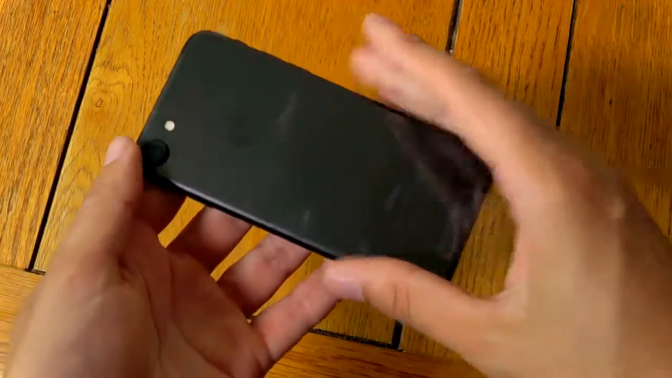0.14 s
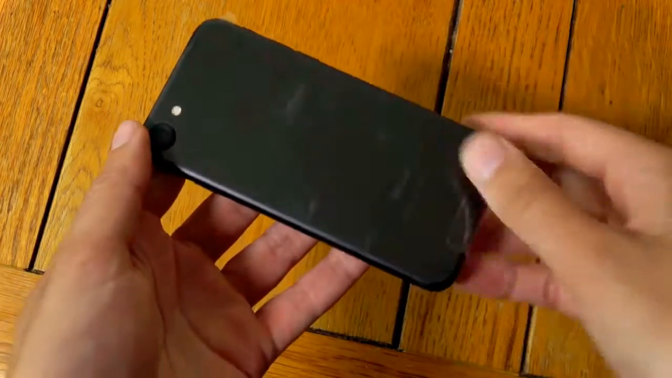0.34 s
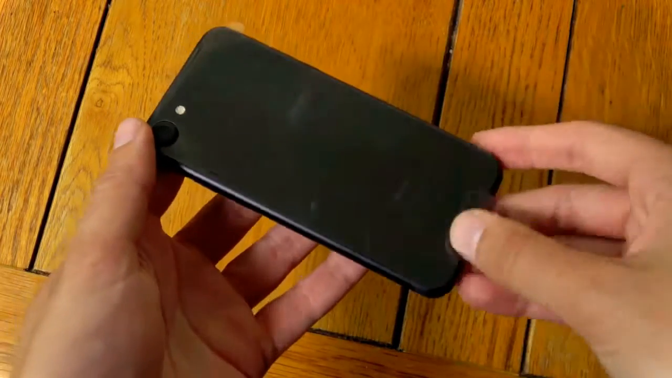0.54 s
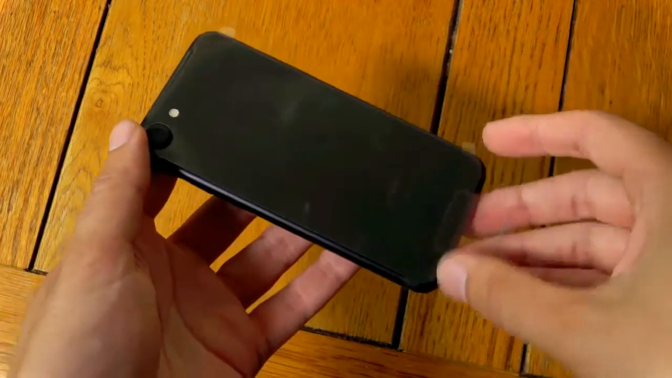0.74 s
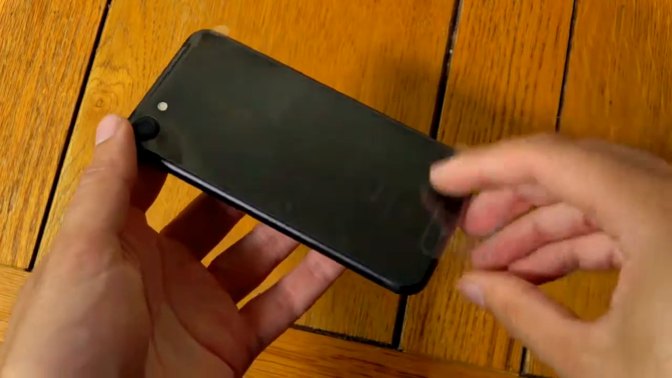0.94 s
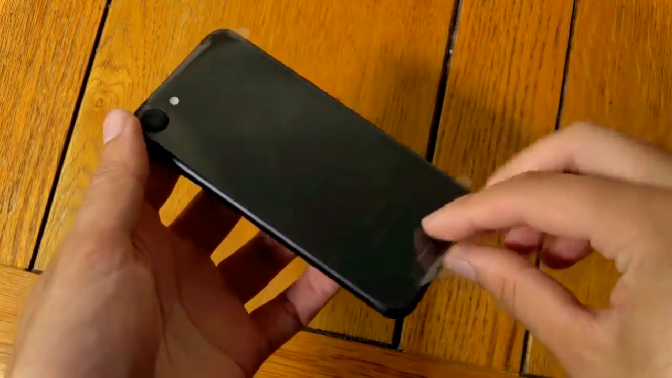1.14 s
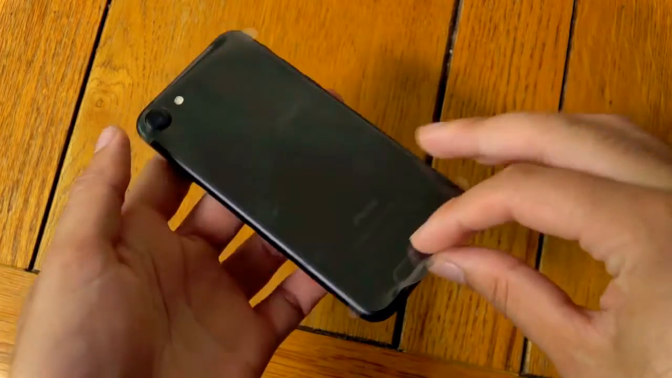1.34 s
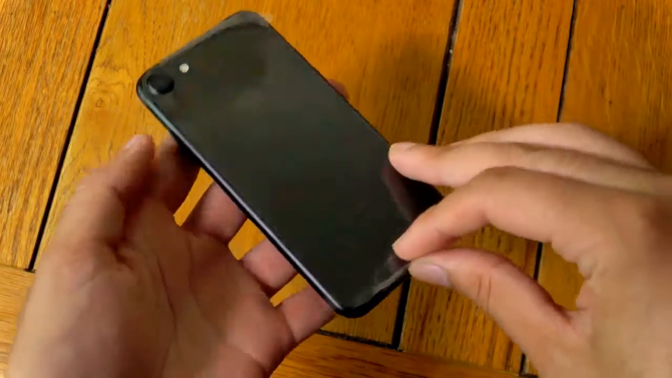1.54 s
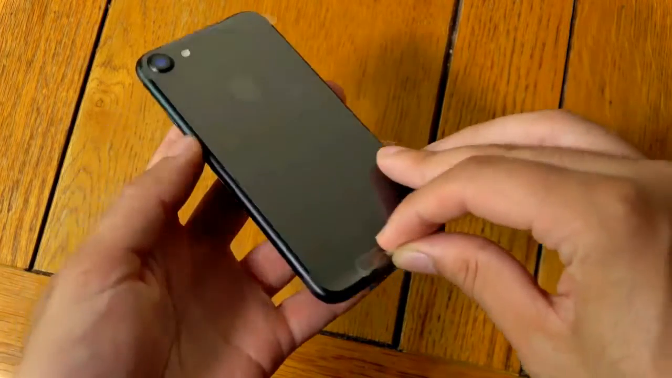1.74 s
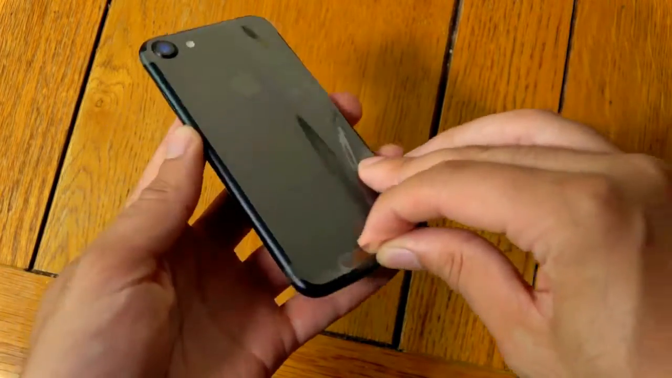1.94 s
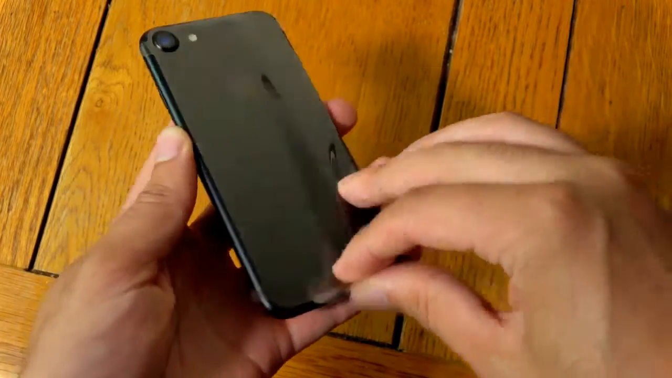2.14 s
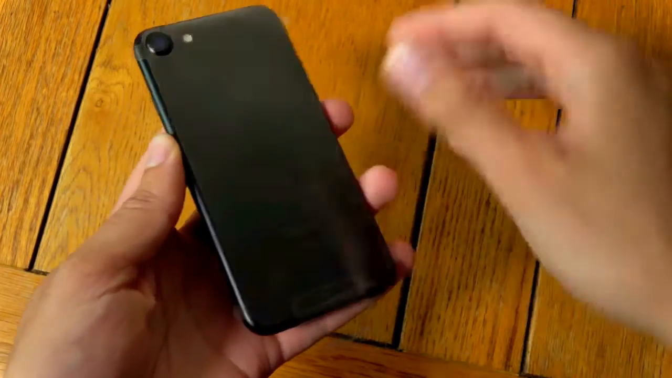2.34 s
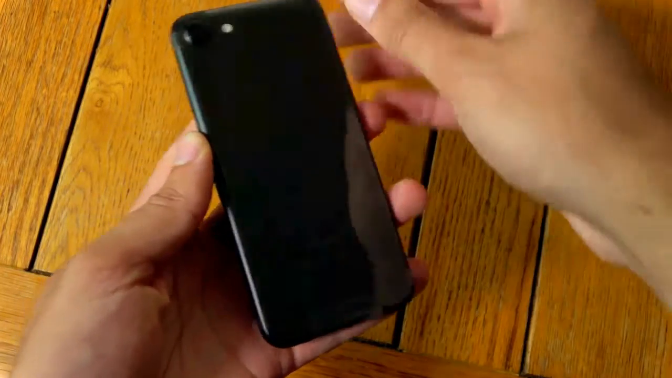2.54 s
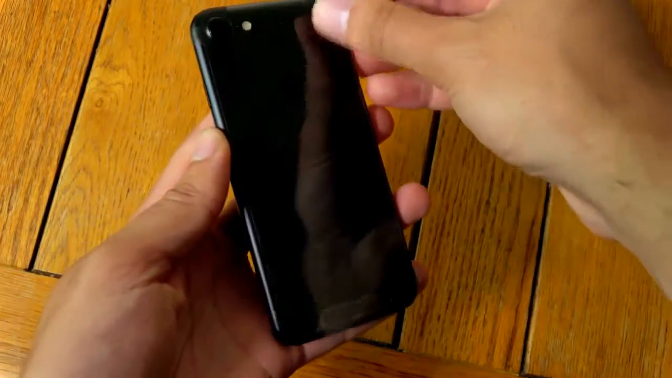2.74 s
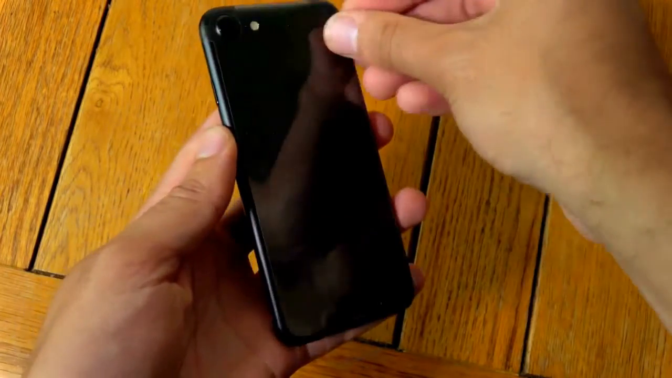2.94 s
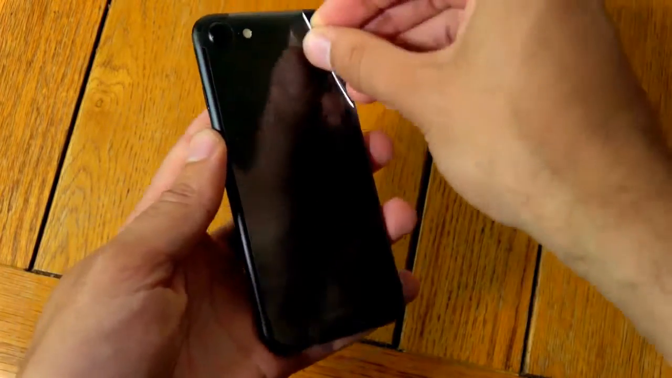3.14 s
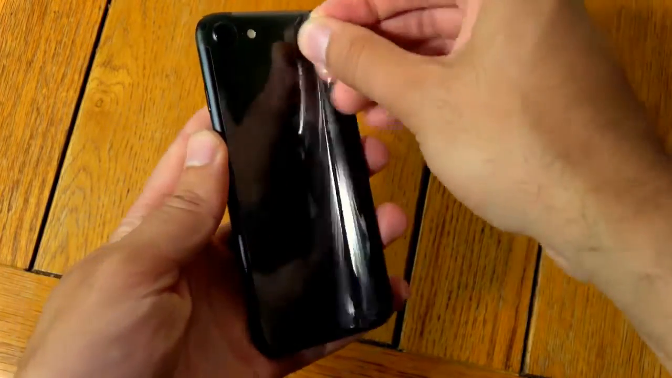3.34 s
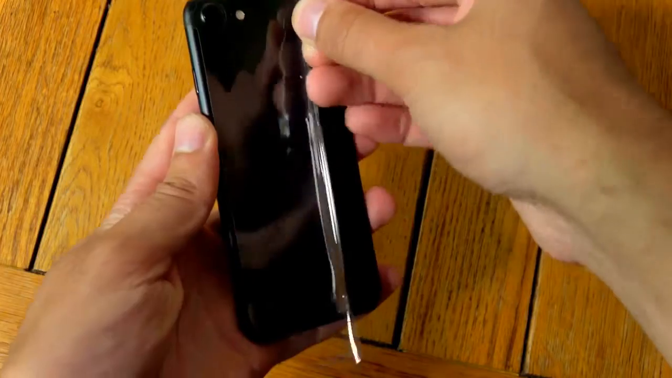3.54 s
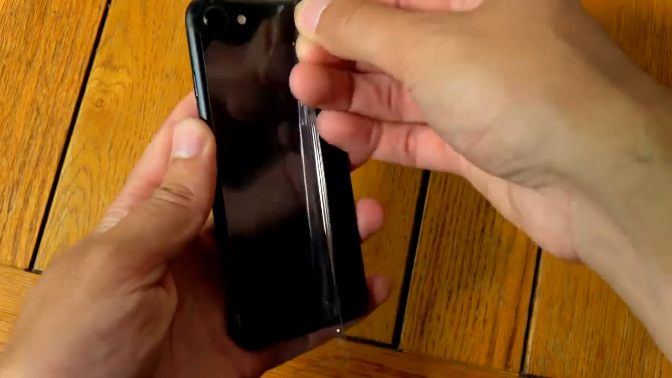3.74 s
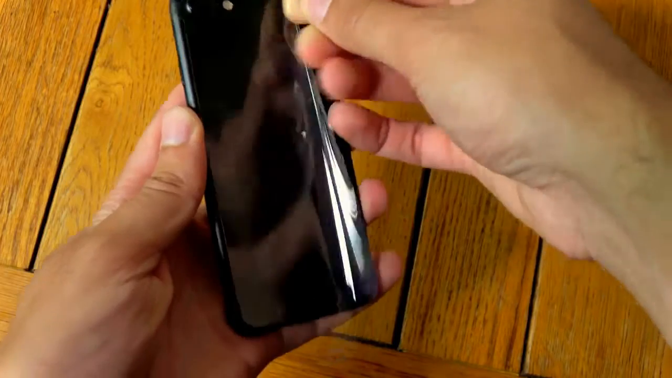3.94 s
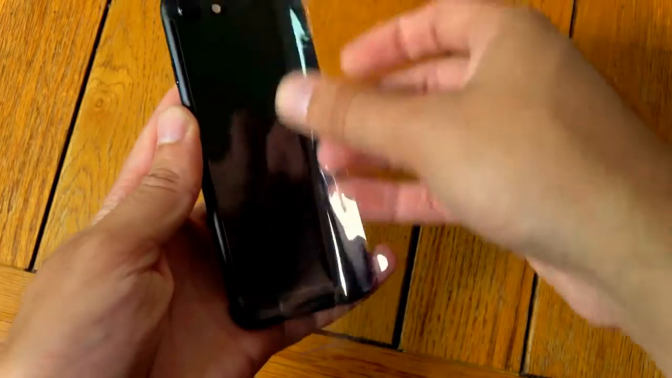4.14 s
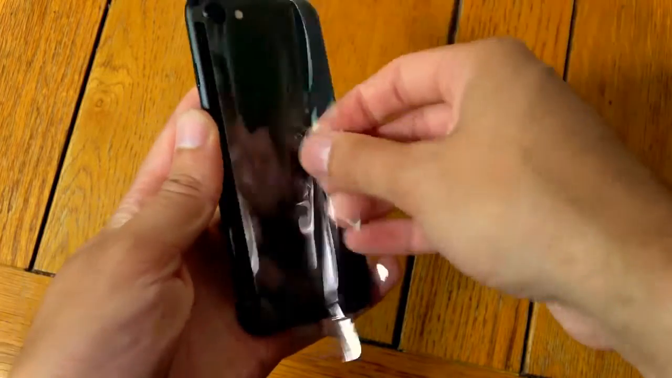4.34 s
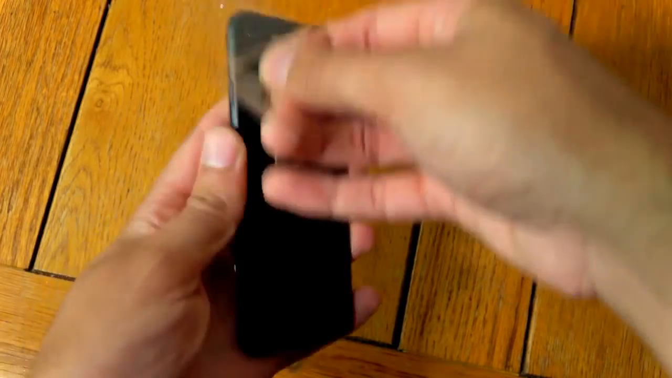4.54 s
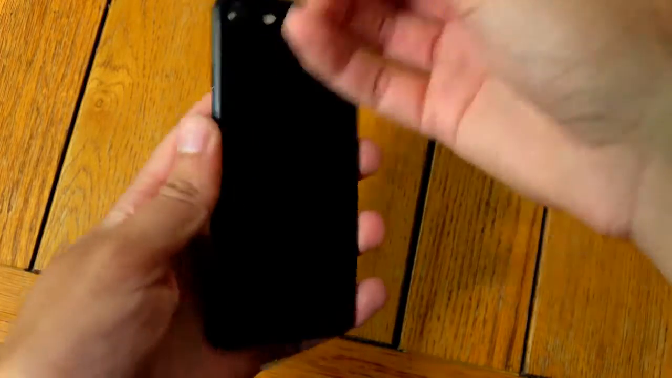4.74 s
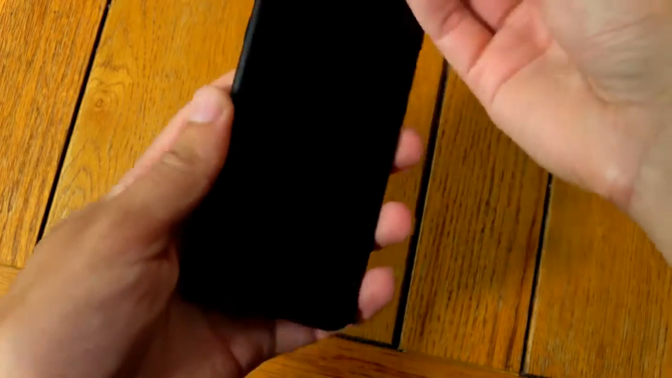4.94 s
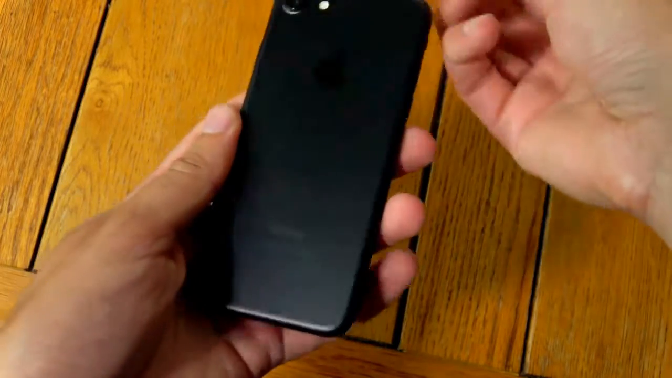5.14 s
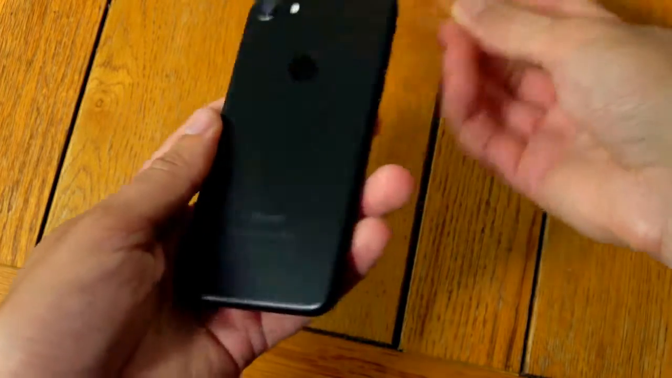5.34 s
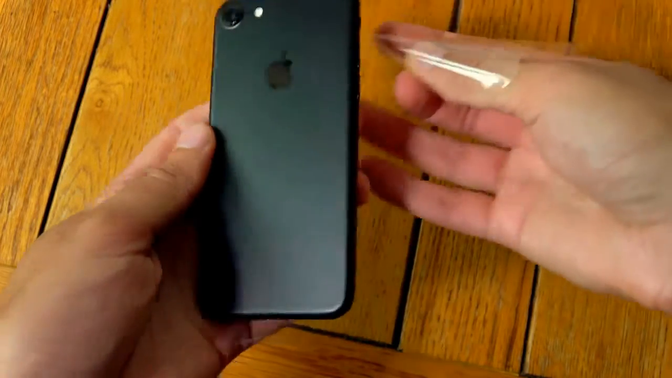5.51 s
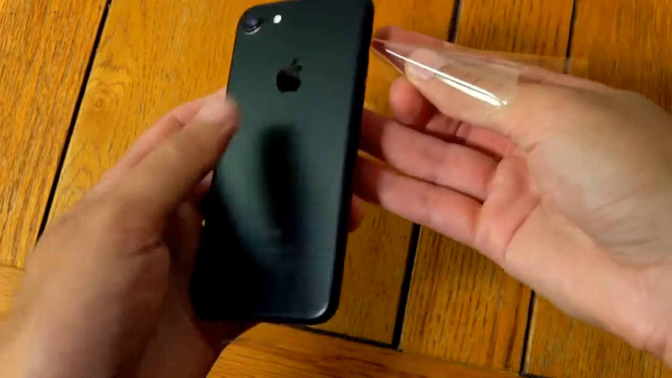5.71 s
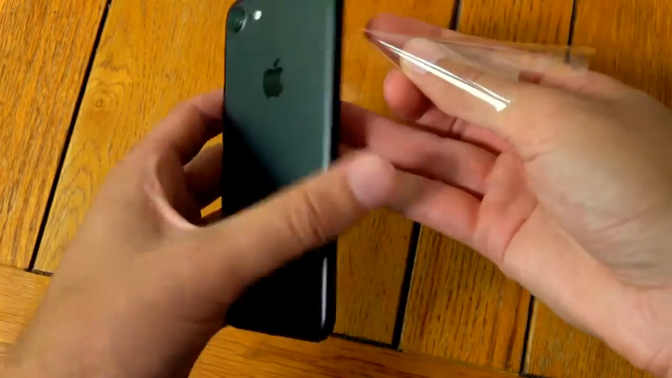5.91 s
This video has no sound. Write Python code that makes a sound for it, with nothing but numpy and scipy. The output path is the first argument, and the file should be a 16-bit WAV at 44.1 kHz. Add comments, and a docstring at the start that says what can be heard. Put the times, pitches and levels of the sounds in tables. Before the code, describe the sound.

Close to the microphone in a small room, fingers rub and pick at plastic film on a phone. Faint low rumble and soft ticks come first, a sharp snap or two, then louder isolated cracks, and finally a dense burst of bright crackling as the film comes free, thinning into scattered crinkles.

```python
"""A low rumble and faint rubbing come first, then fingers pick at the protective film on a phone and peel it.
It is heard close to the microphone in a small room: bursts of tiny slips make the sharp snaps and crinkles,
grainy noise the sliding on skin and glass, dying tones the flicked edges, brief sines the low knocks.
A wooden surface and the walls return echoes and a diffuse tail, and the recorder clips the highest peaks."""
import sys
import numpy as np
from scipy import signal
from scipy.fft import rfft, irfft
from scipy.io import wavfile
from scipy.ndimage import uniform_filter1d

SR = 44100
rng = np.random.default_rng(int(sys.argv[2]) if len(sys.argv) > 2 else 0)


def master_out(mix):
    """Clip the mix to full scale and print it as 16-bit PCM to the path in sys.argv[1]."""
    frames = np.transpose(np.atleast_2d(mix))
    ceiling = np.clip(frames, -1, 1)
    pcm = np.round(ceiling * 32767).astype(np.int16)
    wavfile.write(sys.argv[1], SR, pcm)


N = 263484
# upper limit of the recorder, in Hz
TOP_HZ = 15750


def snaps(release_share=0.24, uneven_db=4.0, grain_s=0.00058, thrown_db=-2):
    """A crease runs through the film as an avalanche of slips; returns the direct sound and that sent to the room."""
    # The film buckles. Each row: start in seconds, length in seconds (0.3 ms at least), level in dB,
    # ring of the buckling facet in Hz, body in dB (before its share per band), edge in dB.
    buckles = [(0.404, 0.0049, -37, 3570, 8, 11), (0.483, 0.0035, -42, 10500, -1.5, 7),
               (0.862, 0.0043, -55, 1480, 13, -16), (1.0788, 0.0011, -31.5, 4700, 2, -5),
               (1.3796, 0.0024, -22.5, 2000, 9.5, -10), (1.462, 0.00072, -29, 9100, -4, -6),
               (1.473, .0008, -12.5, 11400, -5.5, -7.5), (2.0253, 0.0015, -46, 10440, -10, 8),
               (2.4657, 0.00083, -32, 2620, 11, -9), (2.4738, 0.0012, -36, 9000, 0, 2),
               (2.4965, 0.0063, -27, 9000, 0.5, -4), (2.5004, 0.0038, -8, 8840, -4.5, 3.5),
               (2.5033, 0.0048, -10.5, 10300, -5, 3), (2.966, 0.0026, -48, 1190, 51, -13),
               (3.113, 0.0015, -40, 1850, 8.5, -2), (3.1622, 0.00044, -18.5, 11600, 4, 4),
               (3.553, 0.00075, -2, 11270, -16, -9.5), (3.5551, 0.0019, -13.5, 4330, -19, -1),
               (3.654, .0022, 0.5, 4310, -7.5, -2.5), (3.777, 0.0088, -19.5, 4930, 5.5, 4),
               (3.9956, 0.00057, -6, 5500, 4, 5), (4.1613, 0.005, -35, 2570, 4, -11),
               (4.1927, 0.0031, -5, 9200, -2.5, 3), (4.2894, 0.003, -8, 9900, -5, -2),
               (4.584, 0.0011, -28, 6300, 11.5, 5), (4.6405, .0022, -8.5, 10300, -7.5, 0.5),
               (4.6616, 0.00067, -1.5, 10700, -4, 3.5), (4.6816, 0.002, -2.5, 8800, -3.5, 7),
               (4.7198, 0.0043, -8, 8800, -0.5, 5.5), (4.756, 0.003, -2.5, 9100, -2.5, 9.5),
               (4.759, 0.0067, -12, 3550, 2, -2), (4.773, 0.0036, -16.5, 10900, 3, -10),
               (4.783, 0.022, -7.5, 10100, 0.5, 1), (4.7976, .0095, 0, 10600, -1, -5),
               (4.8058, 0.011, -6.5, 6750, -2, 6), (4.823, 0.0033, -9.5, 7840, 2, -4),
               (5.015, 0.0013, -35, 2300, 15, 9), (5.033, .0032, -4, 9600, 1.5, 5.5),
               (5.0813, .0041, -11.5, 10600, 2, -2), (5.1292, 0.00082, -8, 9300, 7.5, 11),
               (5.1336, .0036, -3, 11600, 0, -12.5), (5.171, 0.0016, -4, 9900, 3, 0),
               (5.222, 0.0034, -30.5, 2970, 8, -4), (5.3193, 0.0018, -32.5, 10900, 8, 3),
               (5.456, .0005, -20.5, 8240, 8.5, 10), (5.4762, 0.0025, -11, 3700, -1, 0.5),
               (5.496, 0.0012, -8, 5060, -8, 0), (5.5016, 0.0057, -4.5, 10500, -1, -0.5),
               (5.5398, 0.0083, -5.5, 10100, -4.5, -13), (5.561, 0.0034, -16.5, 4200, -2, 5),
               (5.6746, .0013, -18, 2110, 6, -12), (5.7065, 0.0059, -18, 10000, 2.5, -11),
               (5.802, 0.00068, -12.5, 8660, -13, -14), (5.8068, 0.0023, -6.5, 9700, 1, -1.5),
               (5.815, 0.0023, -10, 10800, -6.5, -0.5)]
    direct, thrown = np.zeros((2, N)), np.zeros((2, N))
    for start, length, db, ring_hz, body_db, edge_db in [*buckles, *crinkles()]:
        colour = colour_of(start, body_db, edge_db)
        length = max(length, .0003)
        # a longer avalanche also takes longer to come to rest
        release = .0004 + release_share * length
        t = np.arange(min(int((length + 8 * release) * SR), 2000)) / SR
        avalanche = np.exp(-np.maximum(t - 0.97 * length, 0) / release)
        uneven = np.interp(t / grain_s, np.arange(128), rng.standard_normal(128))
        slips = rng.standard_normal((2, 2000))[:, :len(t)]
        force = slips * avalanche * undb(uneven_db * uneven)
        add(direct, start, film(force, length, db, ring_hz, colour,
                                ring_db=8, ring_octaves=0.25, bass_db=-2))
        # the room gathers all directions at once, so it hears the smooth colour of a single click
        click = np.array([[1.], [0.]])
        add(thrown, start + length / 2, film(click, length, db + thrown_db, ring_hz, colour,
                                             ring_db=6.5, ring_octaves=0.32, bass_db=-34.5))
    return direct, thrown


def crinkles(body_db=4, edge_db=0, ring_octaves=.45, count=7):
    """Flexed film gives small snaps scattered at random, returned as rows like those of the larger snaps."""
    # Each row: start of the flexing in seconds, its end in seconds, middle level of its snaps in dB.
    flexings = [(2.22, 2.338, -56), (2.448, 2.49, -45), (3.827, 3.955, -40), (4.663, 4.796, -24),
                (5.037, 5.27, -31), (5.4, 5.785, -48)]
    length_s, middle_hz, scatter_db = .0005, 7520, 1
    rows = []
    for begin, end, db in flexings:
        # one snap at a random moment of each equal share of the stretch
        times = begin + (end - begin) * (np.arange(count) + rng.random(count)) / count
        for start, (strength, facet) in zip(times, rng.standard_normal((count, 2))):
            ring_hz = middle_hz * 2 ** (ring_octaves * facet)
            rows.append((start, length_s, db + scatter_db * strength, ring_hz, body_db, edge_db))
    return rows


def rubs(grit_db=4.5, catch_db=3.5, trim_db=-4.0, edge_db=4.5):
    """Sliding film sticks and slips in fine grains and coarser catches; each stroke builds up and lets go."""
    # Film and fingers slide. Each row: start in seconds, length in seconds, level in dB before the trim,
    # ring in Hz, body in dB (before its share per band).
    strokes = [(0.084, 0.062, -63, 3430, 19), (0.13, 0.36, -68.5, 1900, 30), (0.89, 0.14, -56, 8950, 4),
               (1.307, 0.066, -55.5, 6960, 4), (2.16, 0.03, -55, 10580, -11.5),
               (2.208, 0.14, -54, 10600, -17.5), (2.414, 0.064, -53.5, 9000, -8),
               (2.61, 0.021, -55, 1300, 27), (3.065, 0.028, -60, 11780, -6), (3.421, 0.013, -52, 10000, 3),
               (3.833, 0.059, -32, 1465, 14.5), (3.895, 0.061, -32.5, 9850, 1),
               (4.085, 0.055, -34, 10700, 5), (4.36, 0.21, -50.5, 11400, -3.5),
               (4.576, 0.057, -48.5, 2080, 22), (4.66, 0.2, -24.5, 8600, -7), (4.981, 0.26, -36, 2490, 12),
               (5.06, 0.036, -26, 10500, -7), (5.354, 0.037, -40.5, 1204, 18), (5.4, 0.16, -42, 8100, 8),
               (5.531, 0.014, -11, 12400, 2), (5.658, 0.031, -39.5, 3300, 21), (5.763, 0.028, -30, 3360, 2)]
    out = np.zeros((2, N))
    # random levels, each held for a number of samples
    fine, coarse = (np.repeat(rng.standard_normal(N // hold + 1), hold)[:N] for hold in (20, 260))
    grains = rng.standard_normal((2, N)) * undb(grit_db * fine + catch_db * coarse)
    for start, length, db, ring_hz, body_db in strokes:
        colour = colour_of(start, body_db, edge_db)
        stroke = grains[:, int(start * SR):int((start + 1.05 * length) * SR)]
        u = np.linspace(0, 1, stroke.shape[1])
        swell = np.sqrt(abs(np.sin(np.pi * u ** 1.26)))
        add(out, start, film(stroke * swell, length, db + trim_db, ring_hz, colour,
                             ring_db=6.0, ring_octaves=0.22, bass_db=-24.0))
    return out


def flicks():
    """A fingernail flicks a taut edge, which rings with one quickly dying tone."""
    # Each row: start in seconds, pitch in Hz, peak in dB, time to fall by 60 dB in seconds.
    edges = [(.635, 3360, -43.5, 0.02), (1.081, 2090, -42, 0.034), (1.3804, 3700, -27, 0.015),
             (1.4714, 2590, -28, 0.012), (2.5017, 1074, -21, 0.021), (2.503, 3740, -19.5, .025),
             (2.9684, 3050, -44, 0.011)]
    out = np.zeros((2, N))
    for start, hz, db, t60 in edges:
        t = np.arange(int(t60 * SR)) / SR
        decay = np.exp(-np.log(1000) * t / t60)
        add(out, start, undb(db) * decay * np.sin(2 * np.pi * hz * t))
    return out


def low_knocks(sag=0.12):
    """Short low tones and knocks, some alone and some under loud snaps, sagging slightly in pitch."""
    # Each row: start in seconds, middle pitch in Hz, peak in dB, length in seconds.
    low_tones = [(1.08, 650, -45.5, 0.013), (2.5, 380, -32.5, 0.0037), (3.549, 90, -28, 0.0035),
                 (4.797, 70, -24.5, 0.011), (4.8225, 223, -16.5, 0.0018), (5.035, 292, -24.5, 0.013),
                 (5.086, 364, -27, 0.017), (5.133, 198, -25, 0.0083), (5.149, 477, -20.5, 0.0055),
                 (5.171, 510, -15.5, 0.013), (5.2, 470, -34, 0.0056), (5.225, 515, -30, 0.0075),
                 (5.372, 393, -36, 0.016), (5.502, 61.6, -23, 0.011), (5.543, 210, -18, 0.0022)]
    out = np.zeros((2, N))
    for start, hz, db, length in low_tones:
        u = np.linspace(0, 1, int(length * SR))
        pitch = hz * (1 + sag * (.5 - u))
        tone = np.sin(2 * np.pi * np.cumsum(pitch) / SR)
        add(out, start, undb(db) * np.sin(np.pi * u ** 0.54) * tone)
    return out


def film(force, length, db, ring_hz, colour, ring_db, ring_octaves, bass_db, size=2048):
    """Film driven by a run of tiny slips sounds with a broad colour plus the ring of one facet."""
    # Likeness of left and right in the direct sound. Each row: frequency in Hz, correlation.
    left_right = [(310, 0.63), (2100, 1), (4900, 0.79), (9100, 0.39), (14100, 0.42)]
    # The frequencies in Hz at which the colour of the film is given.
    colour_hz = [400, 1500, 4000, 9000, 14000]
    n = size * (force.shape[1] // size + 2)
    hz = np.fft.rfftfreq(n, 1 / SR)
    low, middle, bright, top = colour
    points = [(40, low + bass_db), *zip(colour_hz, (low, middle, bright, 0, top)),
              (TOP_HZ, top - 4), (SR / 2, top - 24)]
    ring = ring_db * np.exp(-(np.log2((hz + 1) / ring_hz) / ring_octaves) ** 2)
    shape = on_log_axis(hz, points) + ring
    spectrum = stereo(evened(force, n) * causal(shape), on_log_axis(hz, left_right))
    sound = irfft(spectrum, n)[:, :n - size // 2]
    # the level is the rms over the length of the event
    return level(sound, db) * np.sqrt(length * SR / sound.shape[1])


def colour_of(start, body_db, edge_db):
    """Colour of a patch of film: body lifts lows and mids, edge shifts the very top, coming free lifts the bass."""
    # Basic colour of the film in dB, 0 at 9 kHz, one value for each colour frequency.
    basic_db = [-13, -5.5, -1, 0, -2]
    # A broad patch has more body: dB gained per dB of body, one value for each colour frequency.
    body_shares = [0.85, .95, 0.34, 0, 0]
    # the sheet radiates more bass as it comes off the phone between these times
    peel_starts_s, free_s, free_bass_db = 4.4, 4.93, 5
    freed = np.clip((start - peel_starts_s) / (free_s - peel_starts_s), 0, 1)
    low, middle, bright, _, top = np.array(basic_db) + body_db * np.array(body_shares)
    return low + free_bass_db * freed, middle, bright, top + edge_db


def evened(force, n, order=25):
    """Spectrum of a run of slips without its broad humps, so that the film alone sets the colour."""
    spectrum = rfft(force, n)
    power = uniform_filter1d(abs(spectrum) ** 2, n // order + 1, axis=1)
    # a silent channel stays as it is
    return np.array([s * causal(-10 * np.log10(p + 1e-9)) if p.any() else s
                     for s, p in zip(spectrum, power)])


def echoes(x):
    """Nearby wood and walls throw back a few sharp copies."""
    # Each row: delay in seconds, gain in dB.
    reflections = [(.00172, -22.5), (.00732, -19), (.0089, -20), (0.0159, -19.5), (0.0207, -32)]
    out = np.zeros((2, N))
    for delay, db in reflections:
        add(out, delay, undb(db) * x)
    return out


def room(x, likeness=0.65, build_s=0.00043, size=24000):
    """Many reflections merge into a diffuse tail that builds up quickly and dies a little sooner in the treble."""
    # Each row: band centre in Hz, time to fall by 60 dB in seconds, relative energy in dB.
    bands = [(199.3, 0.27, 1), (622, 0.31, -3.5), (1500, 0.25, -5), (3950, 0.27, -6), (9660, 0.23, -10),
             (15400, 0.22, -11.5)]
    t, hz = np.arange(size) / SR, np.fft.rfftfreq(size, 1 / SR)
    diffuse = rfft(stereo(rng.standard_normal((2, size)), likeness)) / np.sqrt(2)
    response = np.zeros((2, size))
    centres = [row[0] for row in bands]
    # each band fades into its neighbours over log frequency
    for own, (_, t60, db) in zip(np.eye(len(bands)), bands):
        band = irfft(diffuse * on_log_axis(hz, list(zip(centres, own))), size)
        decay = np.exp(-np.log(1000) * t / t60) * (1 - np.exp(-t / build_s))
        response += undb(db) * band * decay / np.sqrt(np.sum(decay ** 2))
    return signal.fftconvolve(x, response, axes=1)[:, :N]


def background(rumble_db=4, skin_db=3, air_db=-60.5):
    """Faint steady room air lies under a low rumble and a dull rub of skin that follow the hands."""
    # Hands shift their grip. Each row: time in seconds, then rumble and skin rubbing on the case,
    # both in dB before the base levels rumble_db and skin_db are added.
    grips = [(0.0, -58.5, -61.5), (0.81, -56.5, -68), (1.05, -63.5, -64), (1.33, -64, -63),
             (2.01, -55, -66), (2.38, -58.5, -57), (2.61, -52.5, -62), (3.14, -50.5, -57),
             (3.31, -51.5, -65), (3.96, -67, -61), (4.7, -54, -62), (4.94, -60, -53), (5.32, -58.5, -63),
             (5.65, -59.5, -52), (5.82, -51.5, -63), (5.97, -55.5, -66)]
    # Colours of the low rumble, the skin and the air. Each row: frequency in Hz, relative density in dB.
    rumble_colour = [(15, -14.5), (27, 4.5), (38, -6), (52, -1.5), (70, -16), (120, -44.5), (300, -70.5)]
    skin_colour = [(30, -5), (70, 2.5), (110, -18.5), (170, -6.5), (300, -19), (700, -73)]
    air_colour = [(59, -72), (100, -1.5), (249, -9.5), (283, -5), (461, -11), (705, -14.5), (1420, -21.5),
                  (2080, -22), (2370, -22.5), (3470, -24.5), (16000, -27)]
    s, *columns = np.transpose(grips)
    shift_db, grip_db = (np.interp(np.arange(N) / SR, s, c) for c in columns)
    rumble = level(noise(rumble_colour, likeness=0.18), rumble_db) * undb(shift_db)
    skin = level(noise(skin_colour, likeness=0.27), skin_db) * undb(grip_db)
    air = level(noise(air_colour, likeness=0.24), air_db)
    return rumble + skin + air


def noise(spectrum, likeness):
    """Steady stereo noise of a given colour."""
    hz = np.fft.rfftfreq(N, 1 / SR)
    coloured = rfft(rng.standard_normal((2, N))) * undb(on_log_axis(hz, spectrum))
    return stereo(irfft(coloured, N), likeness)


def stereo(pair, likeness):
    """Left and right of a given correlation (0 to 0.99) from two unrelated signals of equal power."""
    c = np.clip(likeness, 0, .99)
    mid, side = pair[0] * np.sqrt(1 + c), pair[1] * np.sqrt(1 - c)
    return np.array([mid + side, mid - side])


def causal(db):
    """Frequency response with these gains that rings only after it is struck."""
    # folding the cepstrum forward in time gives minimum phase
    cepstrum = irfft(np.log(undb(db)))
    half = len(cepstrum) // 2
    cepstrum[1:half] *= 2
    cepstrum[half + 1:] = 0
    return np.exp(rfft(cepstrum))


def undb(db):
    """Decibels to gain."""
    return 10 ** (np.asarray(db) / 20)


def on_log_axis(hz, points):
    """Read (Hz, value) points joined by straight lines over log frequency."""
    known, values = np.transpose(points)
    return np.interp(np.log(np.maximum(hz, 1)), np.log(known), values)


def level(x, db):
    """Set the rms level."""
    return x * undb(db) / np.sqrt(np.mean(x ** 2))


def add(out, start, sound):
    """Mix a sound in at a time in seconds."""
    i = max(0, int(start * SR))
    part = sound[..., :N - i]
    out[:, i:i + part.shape[-1]] += part


def scene(beamed_db=-7, rub_room_db=0, knock_room_db=-6):
    """The film close to the microphone, its echoes and the quiet room."""
    crackle, thrown = snaps()
    soft = rubs() + flicks()
    knocks = low_knocks()
    close = crackle + soft + knocks
    # part of each snap is beamed at one wall and keeps its ragged spectrum in the tail
    sent = thrown + undb(beamed_db) * crackle + undb(rub_room_db) * soft
    # the low tones and knocks are sent more weakly into the tail
    sent = sent + undb(knock_room_db) * knocks
    return close + echoes(close) + room(sent) + background()


def record(dry):
    """The recorder clips the highest peaks, then cuts the top with a steep low-pass."""
    clipped = np.clip(dry, -.95, .95)
    # order 8, 0.1 dB ripple, 50 dB rejection, run forwards and backwards
    low_pass = signal.ellip(8, .1, 50, TOP_HZ, fs=SR, output="sos")
    return signal.sosfiltfilt(low_pass, clipped)


dry = scene()
out = record(dry)
master_out(out)
```